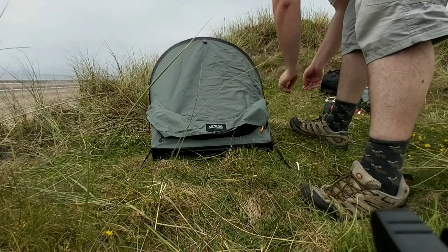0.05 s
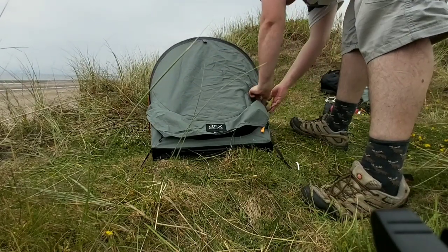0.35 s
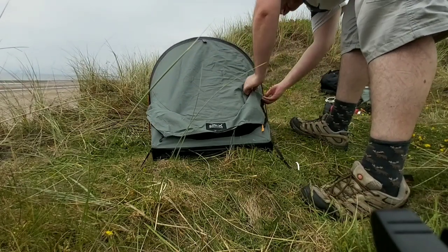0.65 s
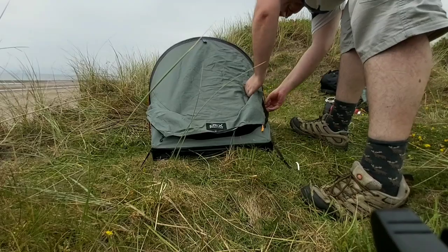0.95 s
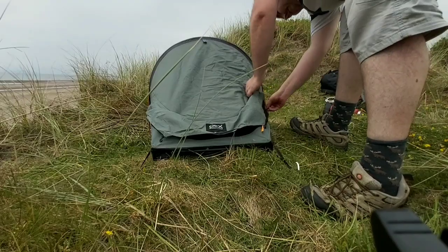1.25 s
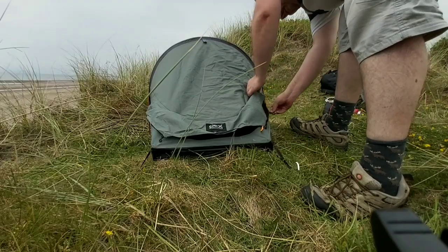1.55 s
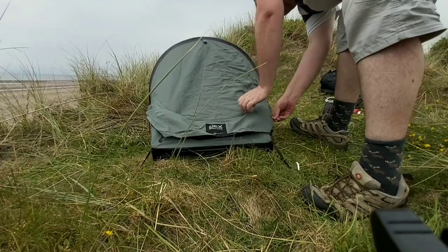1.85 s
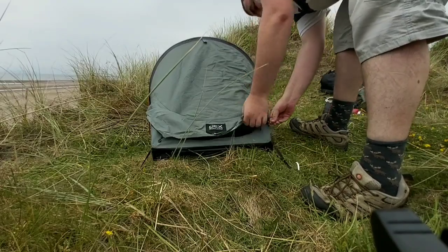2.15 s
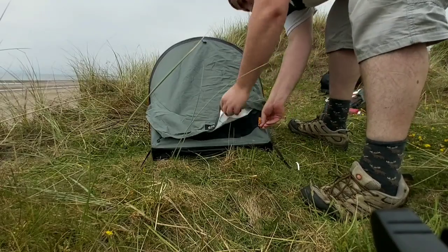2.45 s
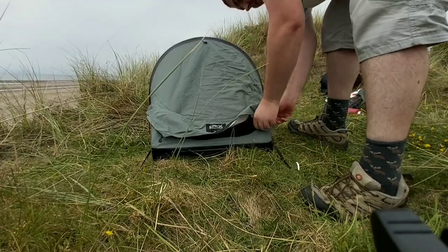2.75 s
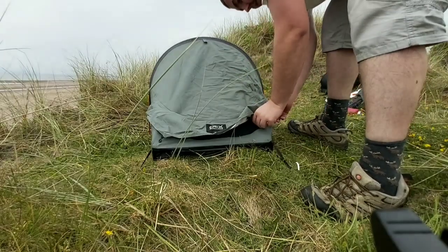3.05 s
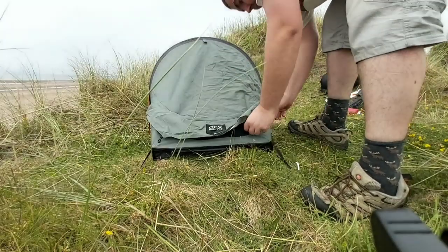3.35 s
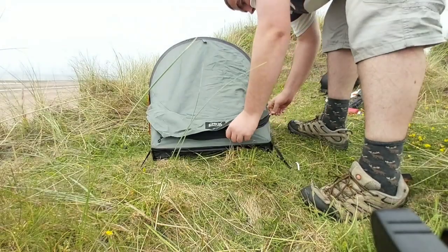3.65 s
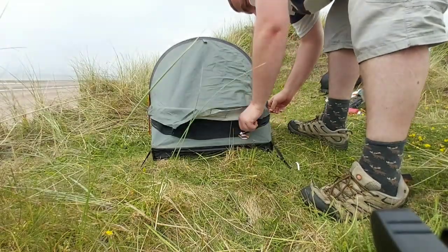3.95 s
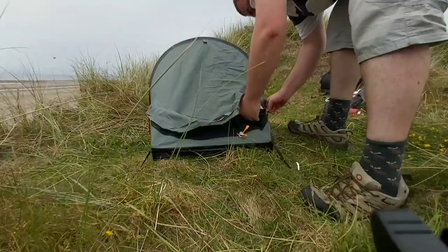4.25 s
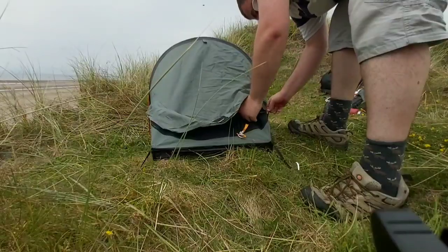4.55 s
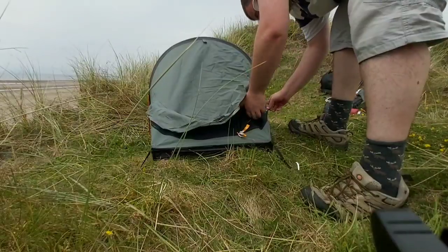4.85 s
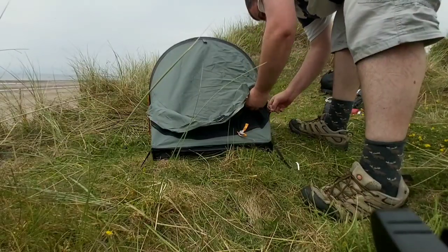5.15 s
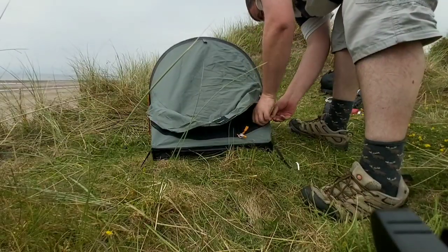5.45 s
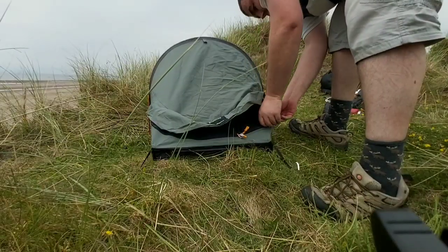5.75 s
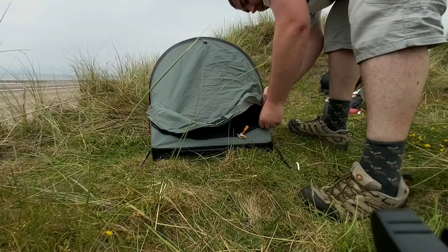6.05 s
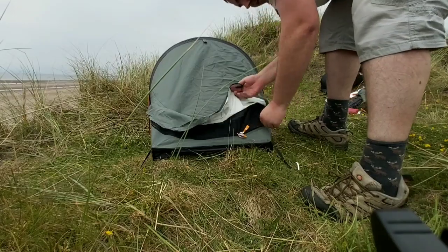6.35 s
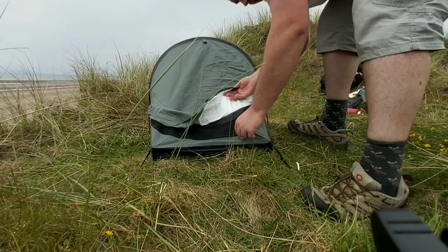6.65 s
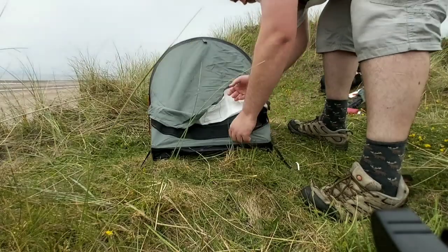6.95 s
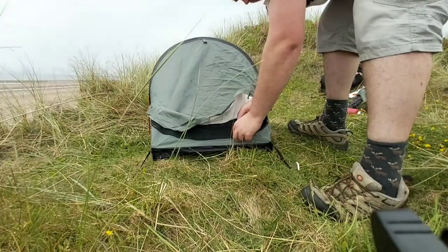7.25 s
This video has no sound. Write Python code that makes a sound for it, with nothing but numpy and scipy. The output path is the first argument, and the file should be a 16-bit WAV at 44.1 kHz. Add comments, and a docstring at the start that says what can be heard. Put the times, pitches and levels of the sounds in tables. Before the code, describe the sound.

Hands rustle the nylon of a small tent a metre or two away. Its zip is then opened in six short, buzzing, rasping pulls, the metal tab rattling and clinking lightly. Between pulls the cloth crumples and creases snap, and a last rustle and clink follow. Wind buffets the microphone in low, irregular gusts, while faint surf washes far behind.

```python
"""A grassy dune: faint, distant surf throughout, and wind that buffets the two microphone ports.
From 0.4 s hands rustle the cloth of a small nylon tent, a metre or two away.
From 1.4 to 6.7 s its zip is opened in six short pulls: the slider trips over the teeth, which buzz
the door panel, rasp and shake the metal pull tab. Between pulls the cloth rustles and creases snap.
In the third pull the panel rumbles low. Near 7 s come a last rustle, more wind and a clink of the tab."""
import sys
import numpy as np
from scipy import signal
from scipy.fft import rfft, irfft, next_fast_len
from scipy.io import wavfile
from scipy.ndimage import uniform_filter1d

SR = 44100
rng = np.random.default_rng(int(sys.argv[2]) if len(sys.argv) > 2 else 0)


def generate_wav(signal):
    """Clip the signal to [-1, 1] and save it as 16-bit WAV at the path in sys.argv[1]."""
    frames = np.transpose(np.atleast_2d(signal))
    scaled = np.clip(frames, -1, 1) * 32767
    pcm = np.round(scaled).astype(np.int16)
    wavfile.write(sys.argv[1], SR, pcm)


N = 321361
T = np.arange(N) / SR
STEPS_S = np.arange(0, N / SR, .001)

# Table levels are relative: trims and filters follow.
# distant surf: f/Hz, level/dB
SURF_SPECTRUM = [(71, -28), (120, -12), (313, -19.5), (426, -22), (491, -20.5), (544, -25), (870, -28.5),
                 (1310, -26.5), (1740, -31.5), (5810, -43), (15800, -37)]
# wind and panel rumble at a port: f/Hz, level/dB
RUMBLE_SPECTRUM = [(13, -28), (22, -22), (53, 5), (108, -1.5), (124, -4.5), (193, -17), (293, -24.5),
                   (450, -45), (580, -41), (990, -120)]
# low swells: t/s, length/s, left level/dB, right level/dB
# at 3.278 and 3.55 s the tent panel rumbles in the third pull; the rest are wind
LOW_SWELLS = [(0.094, 0.0077, -76, -53), (0.321, 0.047, -33.5, -59), (0.387, 0.072, -39, -53),
              (1.93, .01, -68, -51), (2.278, 0.028, -41.5, -58), (2.506, .02, -50.5, -68),
              (2.732, 0.026, -35, -43), (2.82, 0.039, -67, -27), (3.278, 0.044, -57, -45),
              (3.55, 0.045, -49, -37.5), (3.785, 0.016, -58, -39.5), (3.897, 0.011, -74, -40.5),
              (4.246, 0.015, -71, -28), (4.366, 0.015, -72, -35), (4.434, 0.073, -63, -24.5),
              (6.515, 0.093, -48, -39.5), (6.624, 0.017, -54, -27), (6.949, 0.24, -41, -36),
              (7.241, 0.04, -30.5, -34.5)]
# hand grips, drags or folds the cloth: t/s, length/s, rise/(dB/s), hiss/dB, crumple/dB
HAND_MOVES = [(.4, 0.11, 130, -60.5, -66), (.55, 0.11, 200, -66.5, -71), (.76, 0.0079, 197, -66.5, -67.5),
              (1.03, 0.28, 62, -73.5, -76.5), (1.28, 0.051, 200.5, -66, -73.5),
              (1.88, 0.1, 300, -68.5, -71.5), (2.045, 0.038, 700, -60, -58), (2.33, .08, 200, -67, -65),
              (2.46, 0.15, 200, -76.5, -70.5), (2.7, 0.13, 400, -68.5, -66),
              (2.9, 0.025, 200, -62.5, -63.5), (3.02, 0.057, 200, -71.5, -70),
              (3.67, 0.28, 200, -74.5, -68.5), (3.97, 0.072, 200, -73, -70.5), (4.16, 0.077, 344, -62, -58),
              (4.24, 0.021, 200, -60, -59), (4.36, 0.0068, 400, -65, -58.5), (4.492, 0.057, 600, -60, -58),
              (4.92, 0.0079, 300, -67, -65), (5.02, .02, 120, -63, -72.5), (5.65, 0.011, 350, -70.5, -79),
              (5.76, .01, 300, -73.5, -78), (5.89, 0.012, 200, -76.5, -80), (6.12, 0.01, 300, -72.5, -78.5),
              (6.29, 0.035, 700, -64, -70.5), (6.43, .08, 150, -68, -66.5), (6.75, 0.011, 300, -68.5, -63),
              (6.86, 0.033, 250, -65.5, -69), (7.04, 0.1, 100, -70, -66.5), (7.12, 0.09, 300, -65, -66)]
# sliding nylon: f/Hz, level/dB
HISS_SPECTRUM = [(1060, -28), (1800, -10.5), (2140, -12), (3190, -4), (3760, 0), (7430, 3.5), (8360, 0),
                 (11900, -1.5), (15800, -9)]
# crumpling nylon: f/Hz, level/dB
CRUMPLE_SPECTRUM = [(120, -32), (200, -8), (287, 2.5), (494, -5), (616, -5.5), (2880, -11), (3200, -21.5),
                    (4160, -24), (7040, -120)]
# taut nylon skids: centre t/s, half length/s, level/dB, weave f/Hz, hiss re weave/dB
NYLON_SKIDS = [(0.658, 0.011, -58, 2980, -22), (1.125, 0.17, -71.5, 6640, -7), (1.8, 0.016, -66, 1430, -12),
               (1.881, 0.017, -65, 3200, 9.5), (1.924, 0.026, -60.5, 2760, 5.5),
               (2.063, 0.029, -65, 4040, 15), (4.161, 0.0079, -56.5, 800, -15)]
# pull tab modes: f/Hz, t60/s, level/dB
TAB_MODES = [(8200, .048, -13.5), (8750, .041, -15.5), (11400, .022, -10.5), (11220, .026, -6),
             (14545, .031, -2.5), (14800, .015, -24)]
# tab hits slider: t/s, level/dB, lower modes/dB
TAB_KNOCKS = [(1.3373, -41.5, 1), (2.159, -38.5, -17), (2.171, -35, -2), (2.215, -37, -9),
              (2.7521, -42, -18), (3.524, -35.5, -15), (3.5697, -35, -20), (3.5804, -40, -24),
              (3.8756, -47, -26), (7.2155, -46.5, -17)]
# slider speed, one list a pull: t/s, tooth rate/Hz
SLIDER_SPEEDS = [
    [(1.41, 265), (1.45, 325), (1.52, 285), (1.56, 450), (1.605, 640), (1.65, 483), (1.69, 370),
     (1.73, 163), (1.79, 67)],
    [(2.11, 177), (2.18, 240), (2.24, 300), (2.3, 266), (2.36, 170)],
    [(3.15, 49.8), (3.26, 76), (3.315, 165), (3.345, 255), (3.37, 357), (3.4, 341), (3.43, 423),
     (3.47, 420), (3.5, 342), (3.525, 202), (3.55, 320), (3.585, 155), (3.65, 66)],
    [(4.47, 133), (4.6, 162), (4.68, 130), (4.73, 88), (4.8, 60)],
    [(5.06, 230), (5.12, 335), (5.16, 402), (5.205, 524), (5.25, 500), (5.285, 506), (5.31, 415),
     (5.34, 370), (5.4, 256), (5.52, 125)],
    [(6.42, 240), (6.5, 283), (6.55, 393), (6.59, 476), (6.625, 530), (6.66, 260), (6.72, 100)],
]
# door panel, stretched differently in each pull, one list a pull: f/Hz, level/dB
PANEL_SPECTRA = [
    [(150, -7), (430, -1), (620, -1), (800, -7), (1050, -1), (1450, -7), (1950, -3), (2600, -8),
     (4000, -17)],
    [(150, -3), (400, -10), (2000, -12), (4000, -19)],
    [(120, -4), (200, 3.5), (300, 2), (430, -3), (620, -7.5), (850, -10), (1300, -10.5), (2200, -22),
     (4000, -27)],
    [(150, -8), (350, -3), (650, 0), (950, -1), (1450, -18), (1900, -11), (4000, -30)],
    [(200, -15), (400, -6), (500, -14), (680, -7), (850, -1), (1030, -1), (1250, -13), (1550, -9),
     (2050, -11), (2500, -17), (3100, -12), (3700, -27)],
    [(200, -2), (480, -5), (680, -2), (950, -1), (1200, -9), (1500, -6), (2200, -16), (4500, -19)],
]
# pulls: full force t/s, hold/s, rise/(dB/s), buzz/dB, rasp/dB, unevenness/teeth, scrape re clicks/dB
ZIP_PULLS = [(1.67, 0.033, 34, -51.5, -52.5, 0.04, -5), (2.18, 0.13, 105, -53.5, -56.5, 0.08, 3),
             (3.41, 0.19, 22, -41, -53, 0.04, -8), (4.53, .215, 126, -47.5, -59.5, 0.06, -10.5),
             (5.179, .14, 141, -48, -55.5, .016, -10), (6.55, 0.11, 134, -45, -54.5, 0.05, -3)]
# rasp of the teeth: f/Hz, level/dB
RASP_SPECTRUM = [(1650, -8), (2800, -13.5), (4140, -3), (7120, -3.5), (9590, -4.5), (11100, -1),
                 (13300, -9), (15000, -7), (15800, -60)]
# tab hangs loose: t/s, length/s, level/dB
TAB_RATTLES = [(1.445, 0.038, -58), (1.56, .06, -67), (2.155, 0.11, -53.5), (3.17, .06, -62.5),
               (3.52, .06, -54), (4.582, 0.17, -57), (5.1, .15, -57), (6.63, .04, -56.5)]
# creases snap: t/s, level/dB, f/Hz
CREASE_SNAPS = [(2.3165, -47, 1740), (2.3263, -32, 1900), (3.9928, -49.5, 1550), (4.123, -51, 1540),
                (4.533, -58, 1640), (4.6663, -48, 1890), (6.292, -43, 7400), (6.3815, -48.5, 1770),
                (6.392, -48.5, 1530), (6.475, -48, 1520), (6.6543, -40, 2060), (7.0429, -42, 3600),
                (7.071, -48.5, 2580), (7.12, -50, 1610)]
# eddies at the right port: centre t/s, level/dB, f/Hz, half length/s
EDDY_SLAPS = [(2.845, -22, 120, 0.016), (4.256, -24.5, 153, 0.0036), (4.462, -21, 136, 0.0017),
              (6.633, -18.5, 166, 0.0025), (6.955, -21, 110, 0.0029), (6.977, -21.5, 79, 0.0043),
              (7.159, -22, 113, 0.0026)]


def undb(db):
    """Decibels to gain."""
    return np.exp(np.asarray(db) * (np.log(10) / 20))


def unit(x):
    """Scale to rms 1."""
    return x / np.sqrt(np.mean(x ** 2) + 1e-20)


def smooth(x, samples):
    """Two moving averages."""
    return uniform_filter1d(uniform_filter1d(x, samples), samples)


def steady(x, window_s):
    """Hold the running rms at 1; faster detail stays."""
    power = np.abs(smooth(x ** 2, int(window_s * SR)))
    return x / np.sqrt(power + 1e-4 * np.mean(x ** 2))


def noise(size=N):
    """White noise."""
    return rng.standard_normal(size)


def wander(step_s, offset_s=0):
    """Random drift, spread near 1."""
    knots_s = np.arange(0, T[-1] + 1, step_s)
    return np.interp(T + offset_s, knots_s, noise(len(knots_s)))


def grains(size, rate_hz, spread_db):
    """Random clicks of uneven strength."""
    clicks = (rng.random(size) < rate_hz / SR) * noise(size)
    return unit(clicks * undb(spread_db * np.minimum(rng.exponential(size=size), 4)))


def shape(x, response):
    """Filter by a function of f/Hz."""
    n = next_fast_len(len(x) + 2048)
    f = np.arange(n // 2 + 1) * SR / n + 1e-3
    return irfft(rfft(x, n) * response(f), n)[:len(x)]


def colour(x, spectrum):
    """Filter by (f/Hz, level/dB) points; roll off outside them."""
    hz, db = np.transpose(spectrum)
    log_hz = np.log(hz)
    outside = lambda log_f: np.maximum(log_hz[0] - log_f, 0) + np.maximum(log_f - log_hz[-1], 0)
    return shape(x, lambda f: undb(np.interp(np.log(f), log_hz, db) - 20 * outside(np.log(f))))


def resonate(x, hz, width_hz):
    """Two equal resonances in series, gain 1 at the centre."""
    response = lambda f: 1 / (1 + 1j * (f * f - hz * hz) / (f * width_hz))
    return shape(shape(x, response), response)


def hold(t, start_s, length_s, rise_db_per_s, fall_db_per_s):
    """Gain that rises to 1, holds and falls."""
    early_s, late_s = np.maximum(start_s - t, 0), np.maximum(t - start_s - length_s, 0)
    return undb(-rise_db_per_s * early_s - fall_db_per_s * late_s)


def overlap(gains):
    """Power sum of gains on STEPS_S, interpolated to T."""
    return np.interp(T, STEPS_S, np.sqrt(sum(gain ** 2 for gain in gains)))


def add(out, start_s, x):
    """Mix x into out."""
    i = max(int(start_s * SR), 0)
    out[i:i + len(x)] += x[:max(len(out) - i, 0)]


def surf(level_db=-73.5, surge_db=1, wide_hz=600, side_db=-1):
    """Far surf and grass: a slowly surging wash, alike on both sides only in the bass."""
    surge = undb(surge_db * wander(step_s=1))
    mid, side = (unit(colour(noise(), SURF_SPECTRUM)) for _ in range(2))
    side = undb(side_db) * shape(side, lambda f: f / np.hypot(f, wide_hz))
    return undb(level_db) * surge * np.array([mid + side, mid - side])


def wind_and_panel_rumble(breeze_db=(-71, -67.5), drift_db=2, skirt_db=-25, low_cut_hz=46):
    """Low noise swells over a breeze: wind at each port and, in the third pull, the tent panel."""
    swells = [hold(STEPS_S, start_s, length_s, rise_db_per_s=518, fall_db_per_s=404)
              + undb(skirt_db) * hold(STEPS_S, start_s, length_s, 83, 83)
              for start_s, length_s, _, _ in LOW_SWELLS]
    out = []
    for swells_db, floor_db in zip(np.transpose(LOW_SWELLS)[2:], breeze_db):
        swell_gain = overlap(swell * undb(db) for swell, db in zip(swells, swells_db))
        breeze = undb(floor_db + drift_db * wander(step_s=.2))
        pressure = steady(colour(noise(), RUMBLE_SPECTRUM), .032) * np.hypot(swell_gain, breeze)
        out.append(shape(pressure, lambda f: 1 / np.hypot(1, (low_cut_hz / f) ** 4)))  # mic low cut
    return np.array(out)


def cloth(tug_rise_db_per_s=400, tug_hiss_db=-72, tug_crumple_db=-70.5, fall_db_per_s=117):
    """Hands and slider move the cloth: threads catch in a fine hiss, folds add duller grains."""
    tugs = [(speed[0][0], speed[-1][0] - speed[0][0], tug_rise_db_per_s, tug_hiss_db, tug_crumple_db)
            for speed in SLIDER_SPEEDS]
    slides, folds = [], []
    for start_s, length_s, rise_db_per_s, hiss_db, crumple_db in list(HAND_MOVES) + tugs:
        move = hold(STEPS_S, start_s, length_s, rise_db_per_s, fall_db_per_s)
        slides.append(move * undb(hiss_db))
        folds.append(move * undb(crumple_db))
    hiss = unit(colour(grains(N, rate_hz=9000, spread_db=2), HISS_SPECTRUM))
    crumple = unit(colour(grains(N, rate_hz=3500, spread_db=1.5), CRUMPLE_SPECTRUM))
    return overlap(slides) * hiss + overlap(folds) * crumple


def swishes(width_ratio=.38):
    """Taut nylon skids over itself: the ribs of the weave give a rough pitch, plus broad hiss."""
    out = np.zeros(N)
    for centre_s, half_s, db, hz, hiss_db in NYLON_SKIDS:
        t = np.arange(-3 * half_s, 3 * half_s, 1 / SR)
        weave = unit(resonate(noise(len(t)), hz, width_ratio * hz))
        hiss = undb(hiss_db) * unit(colour(noise(len(t)), HISS_SPECTRUM))
        envelope = np.exp(-(t / half_s) ** 4 / 2)
        add(out, centre_s + t[0], undb(db) * (weave + hiss) * envelope)
    return out


def tab_ring(lower_db, attack_s=.00048):
    """The tab rings after a knock; where it is hit sets the share of the four lower modes."""
    t = T[:SR // 10]
    modes = np.array([undb(db - 60 * t / t60_s) * np.sin(2 * np.pi * hz * t)
                      for hz, t60_s, db in TAB_MODES])
    ring = undb(lower_db) * modes[:4].sum(0) + modes[4:].sum(0)
    return ring * (1 - np.exp(-t / attack_s))


def clinks(trim_db=-3, lower_boost_db=15):
    """The loose tab swings against the slider."""
    out = np.zeros(N)
    for start_s, db, lower_db in TAB_KNOCKS:
        ring = tab_ring(lower_db + lower_boost_db)
        add(out, start_s, undb(db + trim_db) * ring / np.abs(ring).max())
    return out


def pull(t, speed, panel, rattle_gain, settings, ref_hz=407, db_per_doubling=5, fade_s=.031):
    """Each tooth clicks into the panel and shakes the tab; the slider scrapes on to the next."""
    start_s, held_s, rise_db_per_s, buzz_db, rasp_db, uneven, scrape_db = settings
    n = len(t)
    waver = 1 + .013 * unit(smooth(noise(n), SR // 90))  # the hand trembles slightly
    teeth_hz = np.interp(t, *np.transpose(speed)) * waver
    travel = np.cumsum(teeth_hz) / SR
    teeth = np.arange(int(travel[-1]) + 2)
    jitter, drift, click_db = noise((len(teeth), 3)).T
    places = np.sort(teeth + uneven * jitter + np.cumsum(uneven * drift) / 2)
    clicks = np.zeros(n)
    clicks[np.minimum(np.searchsorted(travel, places), n - 1)] = undb(click_db)
    # lows travel more slowly through the cloth, rounding each click
    dispersion = lambda f: np.exp(-4j * np.pi * .000581 * np.sqrt(f * 2000))
    flex = steady(shape(colour(clicks, panel), dispersion), .09)
    # friction peaks just after a tooth lets go
    tooth_phase = np.interp(travel, places, teeth) % 1
    friction = .5 + np.exp(-tooth_phase)
    scrape = steady(colour(friction * noise(n), panel), .15)
    buzz = flex + undb(scrape_db) * 350 / teeth_hz * scrape  # slower: more scrape
    rasp = colour((friction + 1) * grains(n, rate_hz=14000, spread_db=4.5), RASP_SPECTRUM)
    rattle = signal.fftconvolve(clicks * noise(n), tab_ring(lower_db=0))[:n]
    force = hold(t, start_s, held_s, rise_db_per_s, fall_db_per_s=103)
    effort = force * undb(db_per_doubling * np.log2(teeth_hz / ref_hz))
    fade = np.minimum(np.minimum(t - t[0], t[-1] - t) / fade_s, 1)
    return fade * (steady(buzz, .04) * undb(buzz_db) * effort
                   + steady(rasp, .0055) * undb(rasp_db) * effort ** .7
                   + steady(rattle, .011) * rattle_gain)


def zipper(rattle_trim_db=-3, rattle_db_per_s=302):
    """Six pulls; the tab rattles along while it hangs loose."""
    out = np.zeros(N)
    rattle_gain = overlap(
        undb(db + rattle_trim_db) * hold(STEPS_S, start_s, length_s, rattle_db_per_s, rattle_db_per_s)
        for start_s, length_s, db in TAB_RATTLES)
    for speed, panel, settings in zip(SLIDER_SPEEDS, PANEL_SPECTRA, ZIP_PULLS):
        moving = (T > speed[0][0] - .01) & (T < speed[-1][0] + .01)
        t = T[moving]
        add(out, t[0], pull(t, speed, panel, rattle_gain[moving], settings))
    return out


def snaps(decay_s=.0008, width_ratio=1.3, trim_db=2):
    """A crease flips over with a short, damped crack."""
    out, t = np.zeros(N), T[:SR // 40]
    for start_s, db, hz in CREASE_SNAPS:
        crack = resonate(noise(len(t)) * np.exp(-t / decay_s), hz, width_ratio * hz)
        add(out, start_s, undb(db + trim_db) * crack / np.abs(crack).max())
    return out


def slaps():
    """Single eddies swing the pressure briefly to and fro at the right port."""
    out = np.zeros((2, N))
    for centre_s, db, hz, half_s in EDDY_SLAPS:
        t = np.arange(-4 * half_s, 4 * half_s, 1 / SR)
        swing = np.sin(2 * np.pi * hz * t + rng.uniform(0, 2 * np.pi))
        envelope = np.exp(-(t / half_s) ** 2 / 2)
        add(out[1], centre_s + t[0], undb(db) * envelope * swing)
    return out


def from_tent(x, left_lag_s=65e-6, port_db=(-2, 2.5), scatter_hz=1400, paths=12):
    """The door is to the right; moving limbs and cloth scatter treble along paths of up to 6 ms."""
    scatter_share = lambda f: .52 * f ** 2 / (f ** 2 + scatter_hz ** 2)
    right = shape(x, lambda f: np.sqrt(1 - scatter_share(f)))
    left = shape(right, lambda f: np.exp(-2j * np.pi * f * left_lag_s))
    treble = shape(x, lambda f: np.sqrt(scatter_share(f)))
    out = []
    for direct, db in zip((left, right), port_db):
        scattered = sum(np.roll(treble, delay) * unit(wander(step_s=.007, offset_s=rng.random()))
                        for delay in rng.integers(8, SR // 160, paths))
        out.append(undb(db) * (direct + scattered / np.sqrt(paths)))
    return np.array(out)


def scene():
    """Zip and cloth at the tent door, wind on the microphone, surf behind."""
    door = zipper() + clinks() + cloth() + swishes() + snaps()
    return from_tent(door) + wind_and_panel_rumble() + slaps() + surf()


def record(dry):
    """Steep low-pass at 15.8 kHz."""
    return signal.sosfilt(signal.ellip(10, .2, 80, 15800, fs=SR, output="sos"), dry)


dry = scene()
out = record(dry)
generate_wav(out)
```